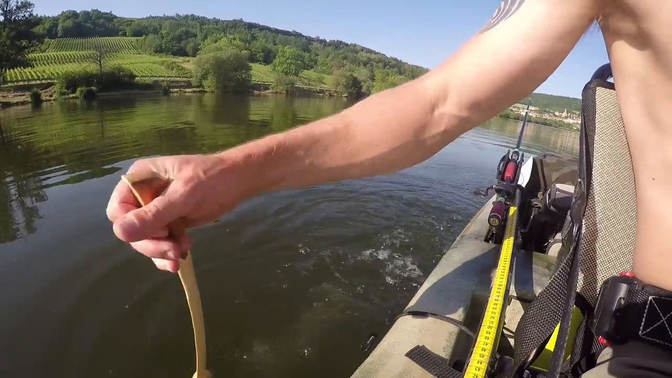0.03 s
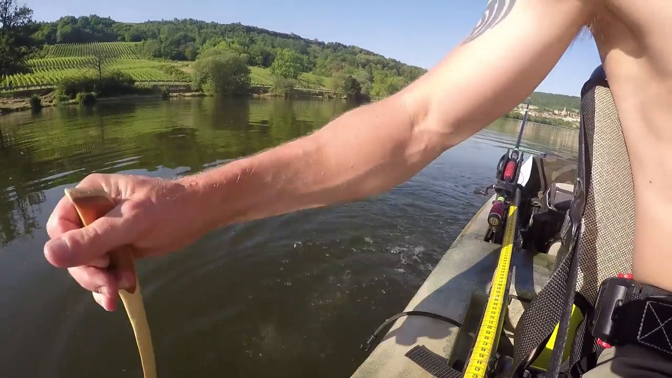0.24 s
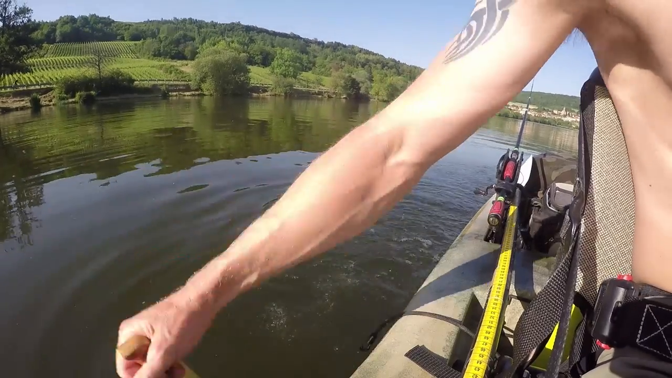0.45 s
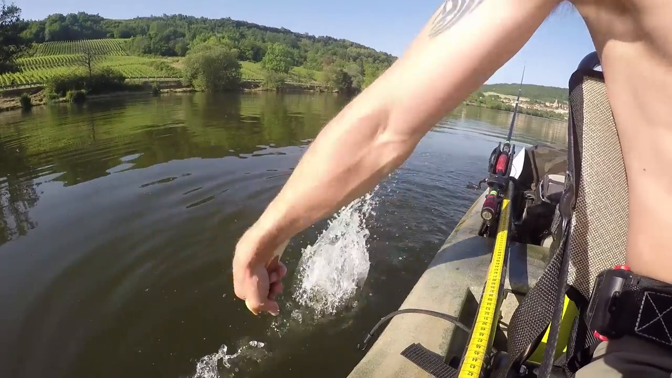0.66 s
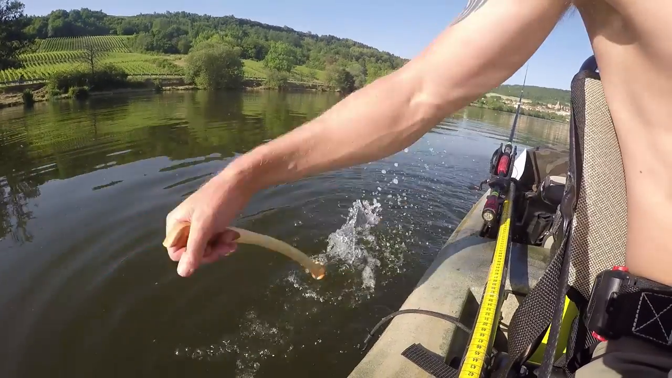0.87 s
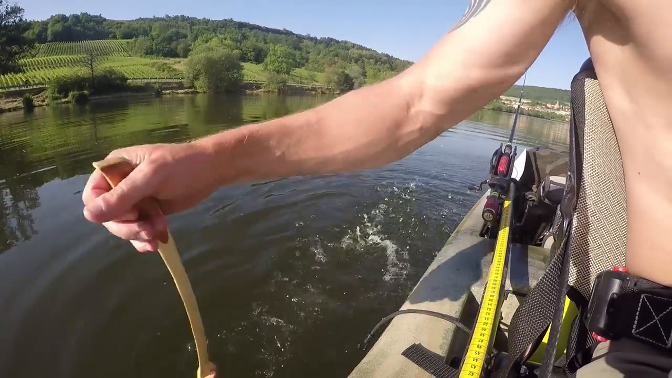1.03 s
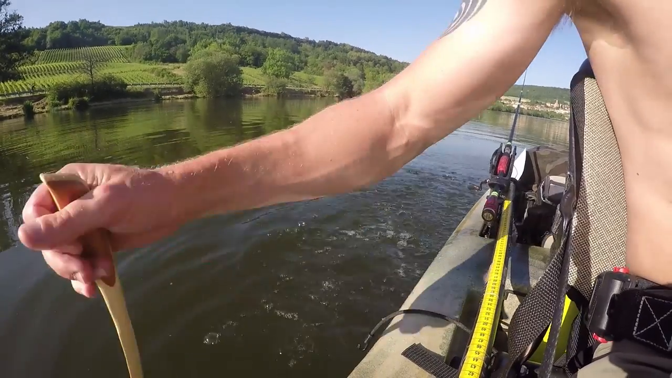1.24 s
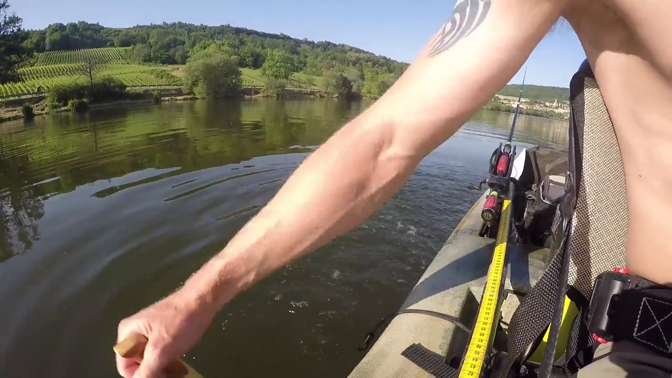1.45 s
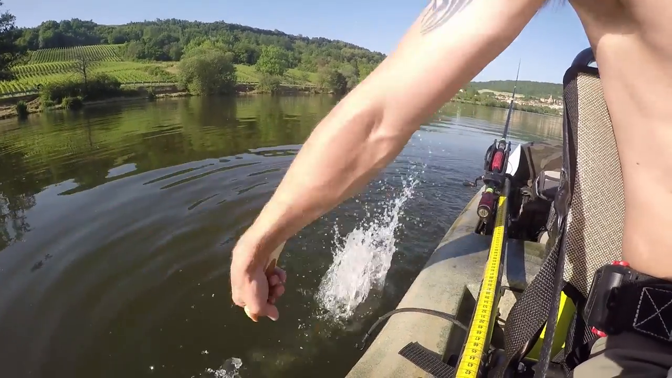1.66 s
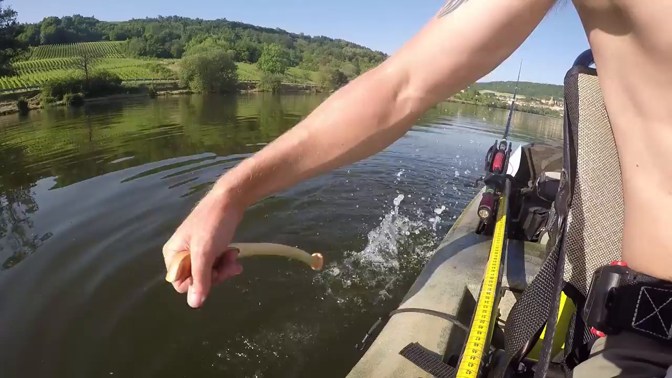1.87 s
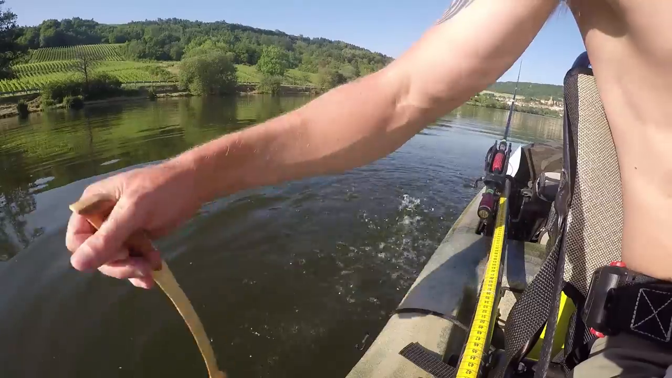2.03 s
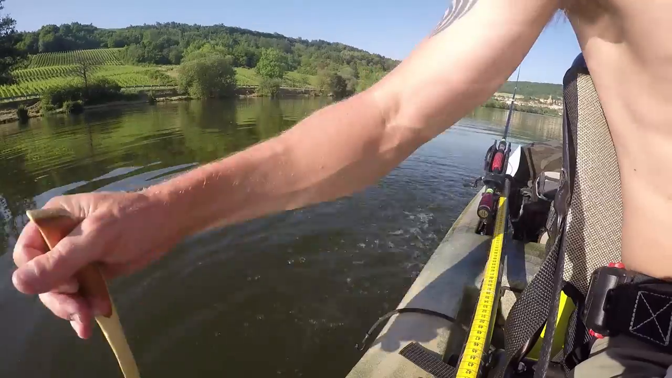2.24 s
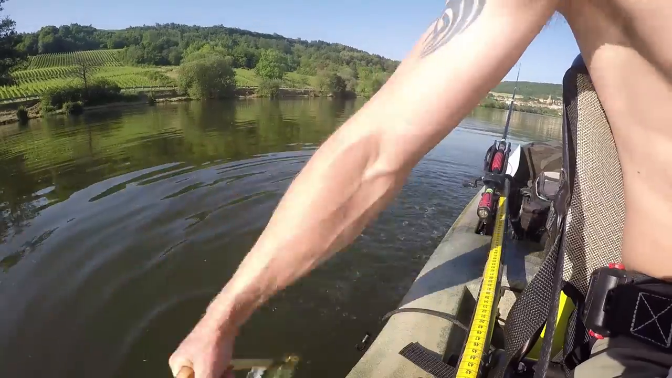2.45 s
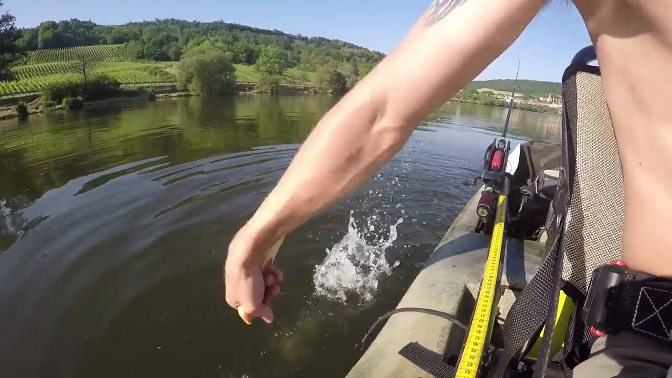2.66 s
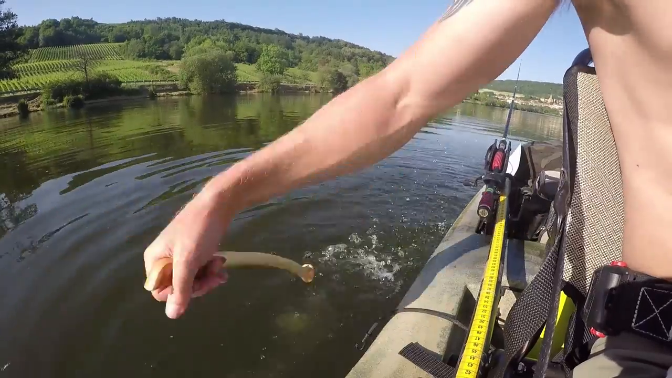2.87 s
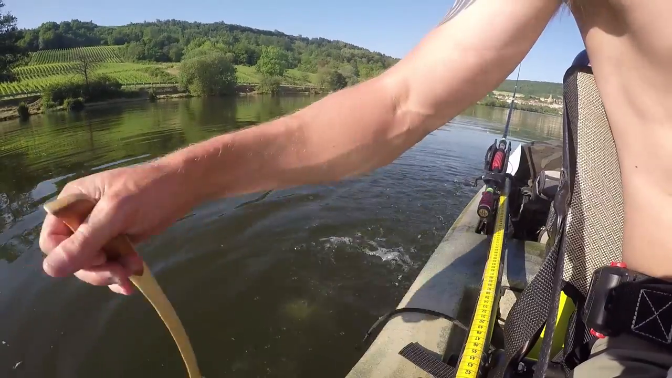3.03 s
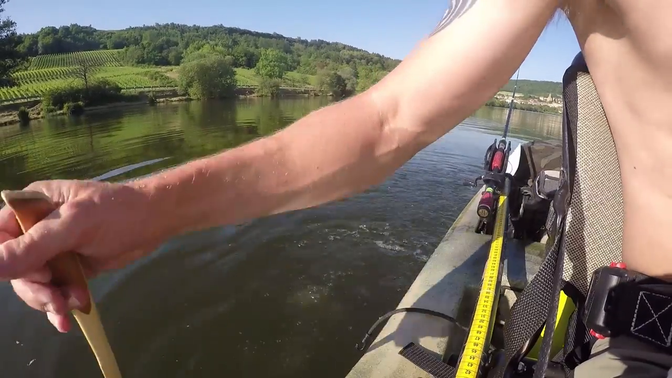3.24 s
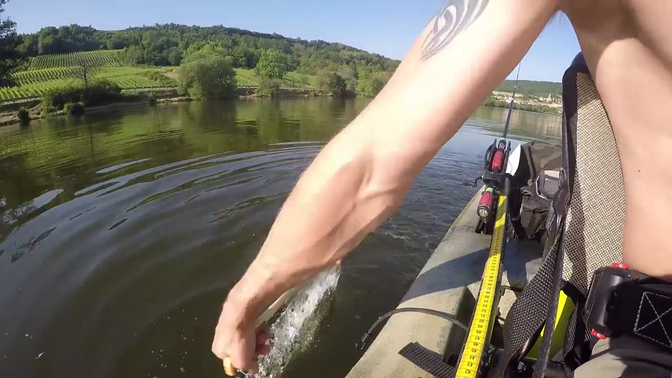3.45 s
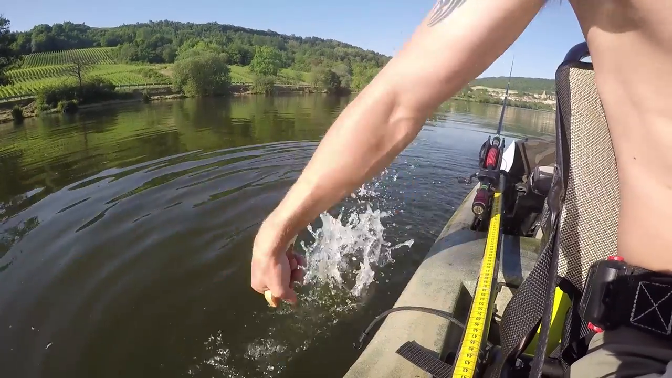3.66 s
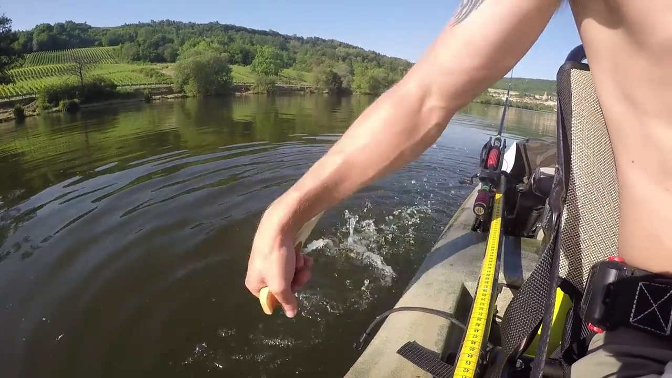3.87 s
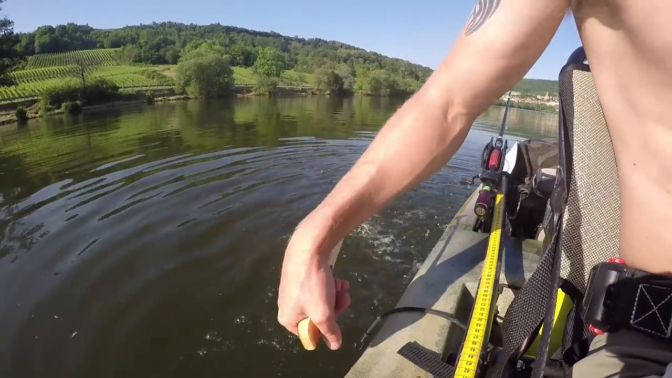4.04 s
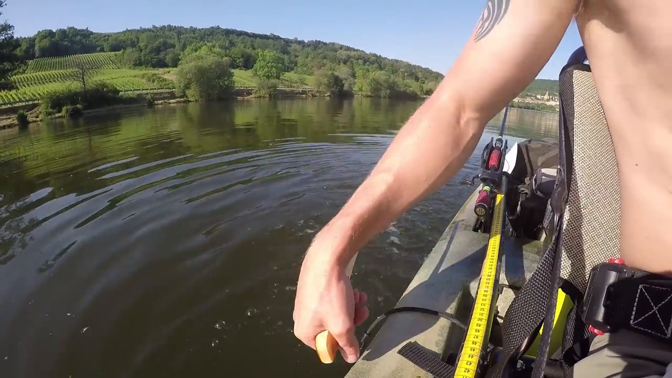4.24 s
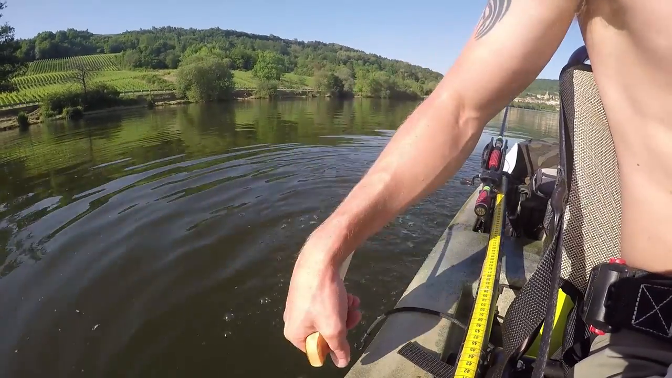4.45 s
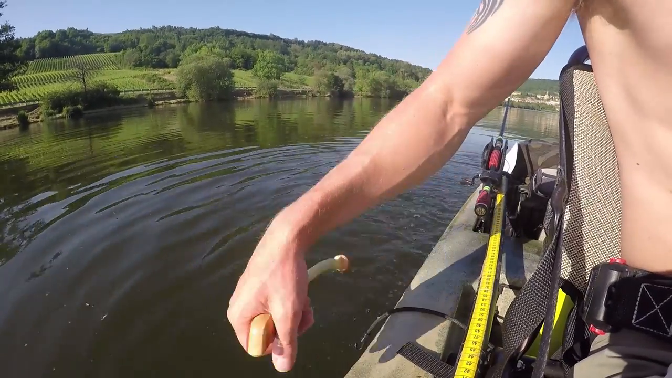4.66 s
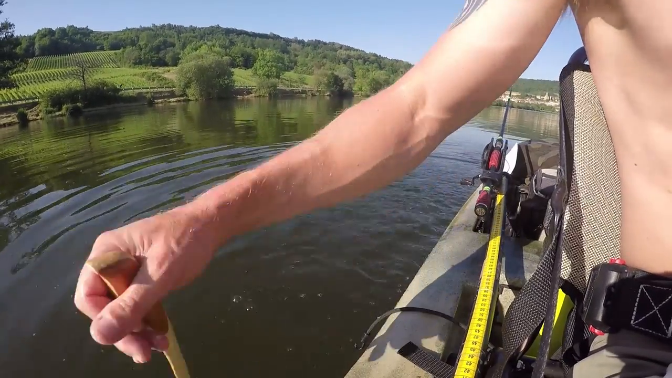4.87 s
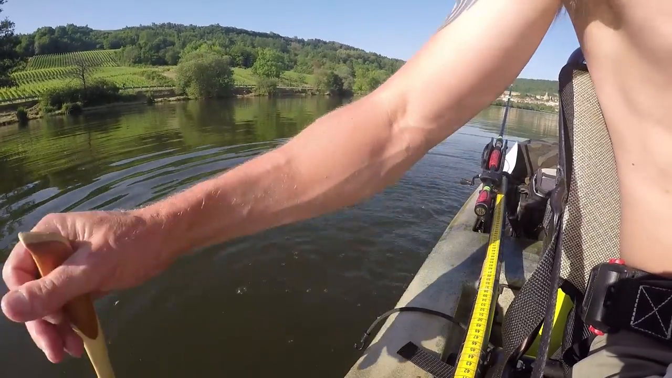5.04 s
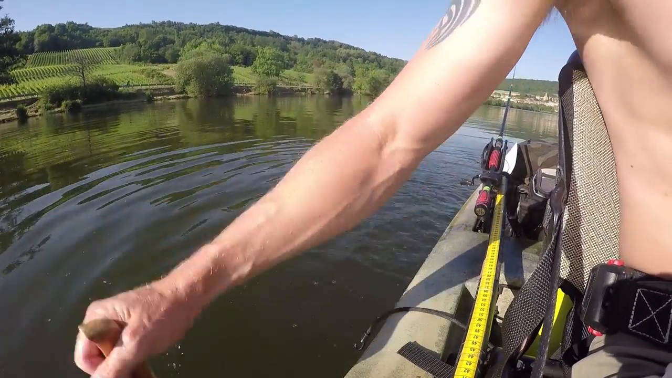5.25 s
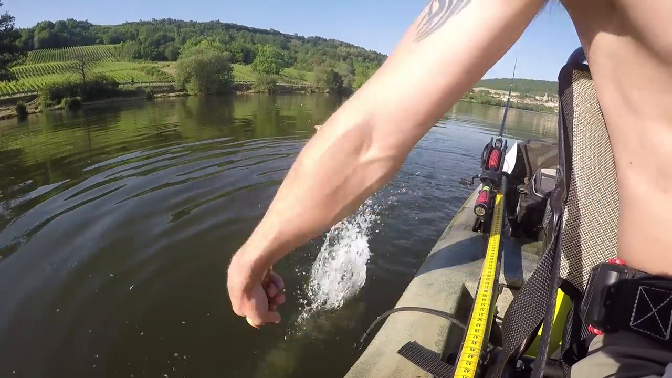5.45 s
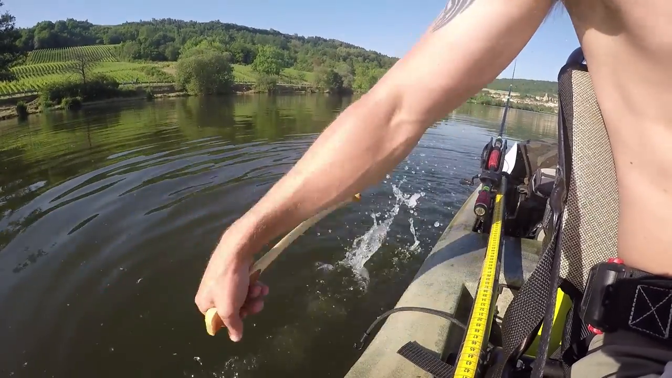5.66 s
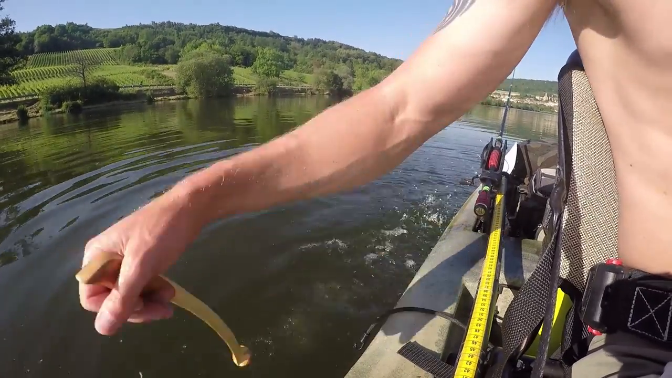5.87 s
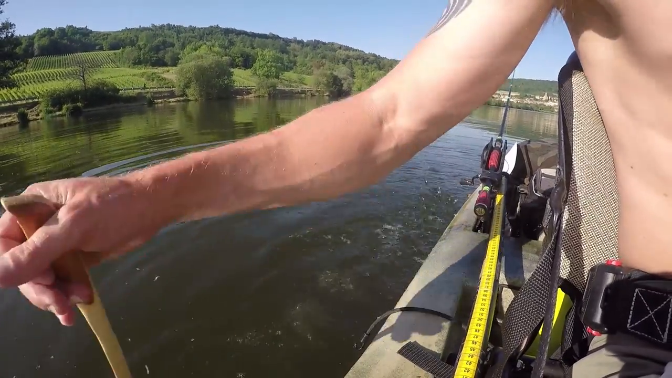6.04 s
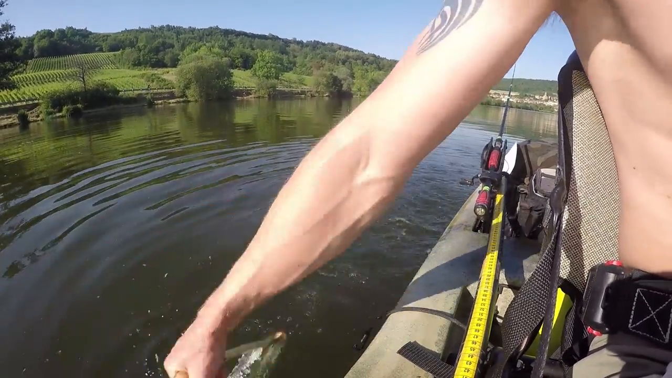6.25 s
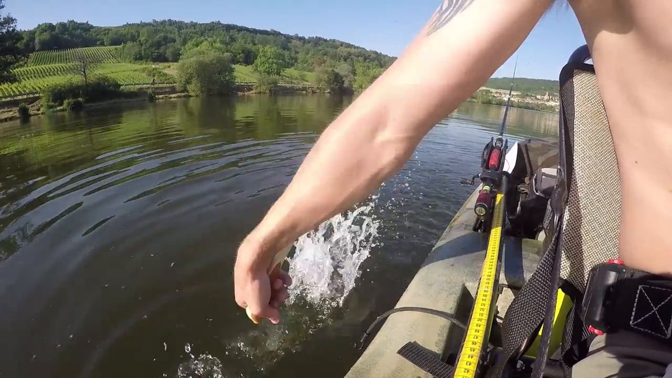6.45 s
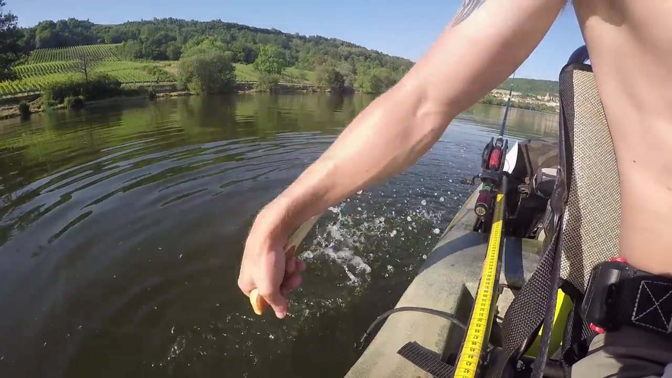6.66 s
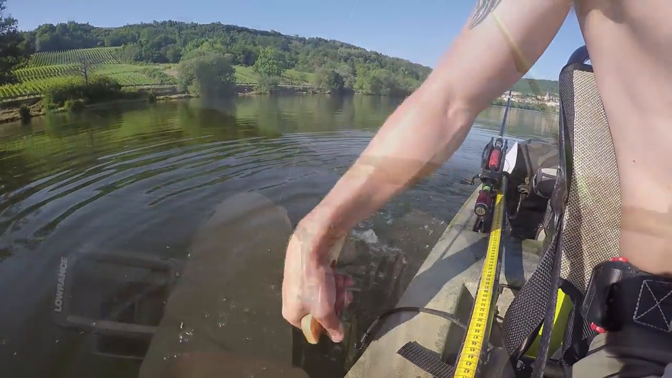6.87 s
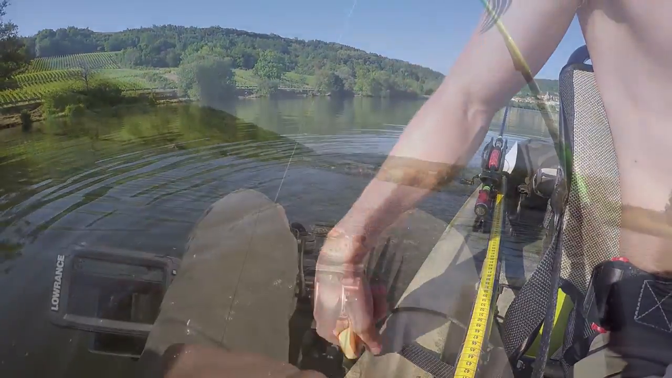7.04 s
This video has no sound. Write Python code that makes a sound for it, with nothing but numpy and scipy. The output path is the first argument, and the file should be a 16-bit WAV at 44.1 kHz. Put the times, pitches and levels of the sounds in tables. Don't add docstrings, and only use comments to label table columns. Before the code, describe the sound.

Close, booming water plops, spaced about a second apart with one longer pause, each followed by a patter of falling spray and drops.

```python
import sys
import numpy as np
from scipy import signal
from scipy.fft import rfft, irfft, next_fast_len
from scipy.io import wavfile
from scipy.ndimage import uniform_filter1d, map_coordinates

SR = 44100
rng = np.random.default_rng(int(sys.argv[2]) if len(sys.argv) > 2 else 0)


def ratio(d):
    e = np.asarray(d, float) / 20
    return 10 ** e


def master(y):
    cut = np.clip(np.atleast_2d(y).T, -1, 1)
    pcm = np.round(cut * 32767)
    wavfile.write(sys.argv[1], SR, pcm.astype(np.int16))


N = 313265
TIME = np.arange(N) / SR

# (time [s], level [dB])
WIND = [(0, -51), (.4, -54), (1.0, -49.5), (1.45, -53.5), (2.2, -52), (2.5, -49.5), (3.0, -52),
        (3.55, -49.5), (4.4, -52), (5.0, -49), (6.0, -50.5), (6.3, -42.5), (6.75, -47.5), (7.1, -43)]
# (frequency [Hz], density [dB per Hz])
BUFFET_SPECTRUM = [(7.1, -24.5), (12, -0.5), (40, -2), (52, -1.5), (75, -14), (102, -14.5), (200, -58.5),
                   (260, -70), (440, -120)]
LAP_SPECTRUM = [(71, -19.5), (120, -1), (204, -8), (226, -10.5), (329, -7), (427, -12), (800, -42),
                (1040, -70.5), (1760, -120)]
AIR_SPECTRUM = [(290, -42), (500, -2.5), (851, -5.5), (2850, -9.5), (3200, -10), (3910, -9.5),
                (5600, -11.5), (12700, -19), (15600, -17.5)]
# (frequency [Hz], level [dB])
WHINE = [(10287, -91)]
# (frequency [Hz], width [Hz], level [dB])
CASE_MODES = [(2733, 86, -6), (4650, 72, 1), (5400, 110, -12.5), (7860, 270, -26.5), (12320, 760, -9.5)]
# (last fall [s], first level [dB], last level [dB], dribble level [dB], gurgle re fizz [dB])
SHOWERS = [
    (1.1, -55, -50.5, -55.5, -4.5),
    (2.082, -55, -54, -53.5, -1.5),
    (2.93, -54, -57, -57, -1.5),
    (4.088, -49, -52.5, -63, -5),
    (5.955, -53, -62.5, -61, -6),
    (6.79, -55, -52, -49, -9.5),
]
# (time [s], fizz level [dB], gurgle level [dB])
RIPPLES = [
    (0.384, -66, -53),
    (1.37, -71, -73),
    (2.418, -92, -80),
    (3.27, -70, -67),
    (4.2, -75, -76),
    (4.49, -80, -66),
    (6.285, -78, -78),
]
# (frequency [Hz], density [dB per Hz])
FIZZ_SPECTRUM = [(590, -51), (1000, 1), (1300, -19), (2500, -1), (3460, -11.5), (4660, -6), (5050, -18),
                 (5470, -7), (8860, -25.5), (13900, -19.5), (15600, -34)]
SWISH_SPECTRUM = [(250, -21.0), (500, 9.5), (1000, -3.0), (1500, -16.5), (3000, -45.5)]
# (time [s], peak level [dB], bubble
# pitch [Hz])
DROPS = [(0.572, -39, 3200), (0.579, -32, 4630), (0.611, -20.5, 2580), (0.6351, -13, 4600),
         (0.857, -32, 5150), (0.864, -37, 1900), (1.579, -31, 4800), (1.592, -29, 1460), (1.6, -31, 1350),
         (1.625, -11, 5320), (1.696, -26, 2800), (1.99, -31, 3840), (2.05, -29, 5900), (2.071, -33, 5200),
         (2.546, -31, 3050), (2.57, -22, 5500), (3.508, -28, 5730), (3.518, -43, 2800), (5.4265, -16, 4200),
         (5.427, -15.5, 3350), (5.488, -26, 4730), (5.812, -36.5, 3970), (5.942, -30, 6300),
         (6.002, -51, 2600), (5.977, -44, 6800), (0.0725, -34, 3550), (0.781, -22, 2700),
         (0.852, -37, 1480), (0.8913, -28.5, 2700), (0.9385, -28.5, 1680), (1.062, -30, 2680),
         (1.091, -30.5, 2760), (1.2635, -42, 4350), (1.263, -48, 2750), (1.198, -54, 2600),
         (1.8467, -29, 2880), (1.9735, -33, 2250), (1.99, -25.5, 2740), (2.0482, -26, 2310),
         (2.824, -29.5, 2530), (2.89, -36, 4700), (3.801, -25.5, 2800), (3.8162, -29, 2080),
         (3.845, -26.5, 2770), (3.926, -45, 2200), (3.9896, -28.5, 2320), (4.032, -26.5, 2400),
         (5.6471, -27.5, 2670), (5.774, -25.5, 2660), (5.843, -19.5, 1970), (5.908, -36, 4700),
         (5.943, -20.5, 4500), (6.571, -33, 5100), (6.655, -29.5, 3830), (6.7125, -24, 2730),
         (6.782, -28, 2650),
         (0.784, -24, 4050), (1.198, -34.5, 4630), (1.773, -35, 4100), (1.933, -32, 1940),
         (2.1231, -38, 2330), (2.943, -34, 4870), (3.7274, -41, 4620), (4.125, -46, 2300),
         (4.1709, -47, 2760), (4.276, -43.5, 5400), (5.58, -37, 1750), (5.746, -45, 1660),
         (5.814, -28, 2840), (6.799, -31.5, 1570), (6.8427, -36, 2140), (0.8, -31, 5700),
         (0.9593, -31, 4760), (1.03, -32, 2360), (1.04, -29, 4630), (1.047, -31, 5400), (1.11, -36, 4650),
         (1.2167, -40, 4430), (1.8, -44, 4520), (1.834, -31, 2570), (1.872, -32.5, 5400),
         (1.882, -33, 2620), (1.9243, -33, 6360), (2.061, -30, 2250), (2.062, -30, 4600),
         (2.0688, -26, 2380), (2.1538, -41, 2550), (2.649, -35, 4750), (2.703, -37, 5500),
         (2.7177, -34, 2600), (2.7965, -41, 2650), (2.9, -30.5, 3800), (3.693, -36, 2250),
         (3.755, -33, 2880), (3.7765, -32, 2550), (3.801, -30, 3900), (3.8443, -31, 5400),
         (3.883, -33, 2260), (3.893, -32, 4650), (3.9023, -32, 3130), (3.937, -38, 2200),
         (3.9697, -31, 4550), (4.049, -42, 3850), (4.08, -38, 2300), (5.686, -53, 3050),
         (5.7069, -46, 2300), (5.796, -33, 2270), (5.79, -36, 2200), (5.853, -26, 2700), (5.921, -37, 2080),
         (5.943, -27.5, 3140), (6.0274, -43, 6920), (6.512, -37.5, 2710), (6.587, -33, 4710),
         (6.605, -35, 2640), (6.7644, -36, 2890), (6.905, -38, 2470)]
# (time [s], peak level [dB], bubble pitch
# [Hz], knock re peak [dB])
HEAVY_DROPS = [(0.336, -44, 580, -13), (0.72, -22, 460, -14), (0.864, -36, 540, 3), (0.892, -33, 915, -26),
               (0.904, -29.5, 440, -1.5), (0.935, -34, 390, -6.5), (0.974, -20.5, 350, 5),
               (0.977, -26.5, 190, -23), (0.99, -26, 406, -22), (1.017, -44, 1100, -20),
               (1.04, -39, 1050, -20), (1.07, -40, 960, -20), (1.254, -54, 1380, -20),
               (1.277, -48, 930, -20), (1.992, -38, 1150, -20), (2.022, -40, 1080, -20),
               (2.89, -41, 970, -24), (3.945, -36, 760, -23), (5.837, -32, 1070, -22.5),
               (1.592, -45, 388, 13), (1.859, -32.5, 1020, -4), (1.975, -35.5, 1080, -14),
               (2.102, -34, 462, -6), (2.756, -34.5, 825, -14), (3.282, -40, 337, 1),
               (3.785, -23.5, 570, 10), (3.789, -22, 390, -15), (3.918, -28.5, 530, -25),
               (3.978, -38, 940, -13), (4.076, -41.5, 946, 6), (4.486, -33, 381, 5.5),
               (5.401, -29, 477, -21.5), (5.422, -13.5, 275, -3), (5.445, -38, 400, -20),
               (5.462, -25, 430, -17), (5.513, -21.5, 454, -21), (5.526, -26, 393, -23),
               (5.54, -28, 470, -26), (2.588, -29.5, 1090, -20), (2.597, -28, 554, -20),
               (2.654, -24, 434, -21), (5.614, -40.5, 880, -20), (2.669, -26, 408, -26),
               (0.714, -34, 1370, -17), (0.738, -34.5, 1060, -33), (0.745, -32, 520, -14),
               (0.852, -45, 1367, -19.5), (5.87, -44, 1110, -20.5), (6.475, -28, 424, -26),
               (5.813, -43, 880, -9), (5.89, -38, 1080, -14.5), (6.337, -48, 401, -17),
               (6.467, -35, 410, -22), (6.655, -35, 300, -23)]
# (time [s], peak level [dB])
TICKS = [(0.6115, -39), (0.52, -58), (5.9415, -53), (6.003, -60), (1.06, -43), (1.0904, -47), (1.1972, -54),
         (1.265, -51), (1.99, -50), (2.0494, -40), (2.1235, -57), (2.9417, -52), (3.283, -52),
         (3.8445, -48), (3.926, -45), (3.9883, -48), (4.2752, -52.5), (5.8273, -47), (5.8416, -46),
         (5.9075, -48), (6.2806, -50.5), (6.782, -44), (6.7994, -45), (6.9055, -50)]
# (frequency [Hz], density [dB per Hz])
TICK_SPECTRUM = [(5000, 7), (8000, 0.5), (13000, 0.0), (15500, -12.0)]
# (time [s], length [s], first pitch [Hz], last pitch [Hz], level [dB])
BIRDS = [(0.449, 0.1, 1780, 1730, -67), (1.211, 0.073, 4280, 3460, -60), (1.398, .014, 2800, 2790, -54),
         (2.198, 0.041, 3250, 3220, -67), (2.386, 0.058, 3750, 3600, -59.5),
         (3.117, 0.059, 2870, 3220, -67), (3.267, 0.37, 1714, 1580, -64.5), (3.253, 0.06, 3350, 3000, -65),
         (4.286, 0.064, 2870, 2590, -62), (4.358, 0.12, 2350, 2020, -68), (4.482, 0.06, 3250, 3050, -65),
         (4.55, .07, 2640, 2510, -62.5), (4.635, .1, 2160, 2190, -73), (4.668, 0.035, 2330, 2360, -65),
         (4.693, 0.066, 2440, 2650, -67), (4.19, 0.077, 3000, 3200, -74), (4.21, 0.064, 2560, 2630, -70),
         (4.335, 0.055, 1920, 1850, -68.5), (4.486, 0.027, 2010, 2060, -67),
         (4.927, 0.057, 2800, 2710, -70)]
# (time [s], length [s], top after [s], top pitch [Hz], droop [Hz per ms squared], level [dB])
ARCHED_WHISTLE = (1.36, .04, .016, 3950, 1.9, -55)
# (time [s], level [dB], decay t60 [s])
CUTS = [
    (.571, -48, 0.41),
    (1.579, -43.5, 0.44),
    (2.541, -42.5, 0.49),
    (3.504, -42, 0.23),
    (5.391, -45, 0.38),
    (6.328, -44, 0.44),
]
# (time [s], hiss level [dB], decay t60 [s], low froth re hiss [dB])
TEARS = [(0.611, -29, 0.089, -1), (0.638, -31, 0.29, 0.5), (1.588, -41, 0.26, -8), (1.632, -33, 0.28, -0.5),
         (2.578, -55, 0.21, 16), (2.61, -36.5, 0.17, -2), (3.535, -38, 0.36, -7), (3.58, -35, 0.15, 1),
         (3.6, -56, 0.25, 10), (5.431, -46, 0.12, 8), (5.467, -44, 0.19, 1), (5.482, -35.5, 0.21, -3),
         (5.824, -36.5, 0.1, 0), (6.338, -45, 0.4, -8), (.585, -58, 0.23, 12), (3.511, -44, 0.36, -5),
         (4.483, -52, 0.045, -6), (2.613, -50, 0.048, 21), (6.364, -39, 0.29, 4.5),
         (6.401, -29.5, 0.075, 3), (6.452, -41.5, 0.083, -8), (0.623, -32.5, 0.05, 10),
         (.71, -54, 0.15, 14), (.65, -42, 0.04, 8), (.778, -45, 0.076, -9.5), (.85, -49.5, 0.12, 4),
         (.889, -44, 0.15, -4), (0.971, -50.5, 0.2, 13), (1.027, -45, 0.092, -9), (1.082, -46, 0.064, -8),
         (1.84, -44, 0.17, -5), (1.056, -42, 0.14, -23), (1.92, -50, 0.058, -16), (1.971, -42, 0.23, -22),
         (2.038, -40.5, 0.13, -23), (2.586, -55, 0.043, 13), (2.821, -48, 0.11, -14),
         (2.886, -46, 0.19, 0.5), (3.548, -33, 0.078, 10), (3.727, -58, 0.045, -15),
         (3.794, -45.5, 0.15, 3), (3.918, -43.5, 0.29, -13), (4.045, -50, 0.046, -1),
         (5.898, -41, 0.11, -16), (6.77, -47, 0.31, -25)]
# (frequency [Hz], density [dB per Hz])
TORN_SPECTRUM = [(820, -35), (1400, -7.5), (2120, 1.5), (3760, -9), (4690, -6), (5030, -5), (8670, -21.5),
                 (13900, -20), (15600, -30)]
FROTH_SPECTRUM = [(250, -21.5), (550, 4.5), (1100, 1.5), (1700, -9.0), (3000, -41.5)]
# (time [s], peak level [dB], cup pitch [Hz], cup re peak [dB], dull part re
# sharp crack [dB])
SLAPS = [
    (0.632, -11.5, 306, -2, -19),
    (1.623, -13, 350, 2, -12),
    (2.5658, -14.5, 298, -2, -17),
    (3.562, -11, 310, -5, -5.5),
    (3.5726, -17.5, 396, -14, -1),
    (5.4236, -13, 473, 2, -18),
    (6.39, -17, 393, -2, 2),
]
SLAP_TREBLE_DB = [
    5,
    -2,
    4.5,
    -12,
    -9,
    -4.5,
    2,
]
# (frequency [Hz], density [dB per Hz])
CRACK_SPECTRUM = [(410, -5.5), (700, -0.5), (931, -13), (2400, 0.5), (3590, -9), (4650, -7), (7430, -21.5),
                  (12800, -27), (15600, -28.5)]
DULL_SPECTRUM = [(400, -14.5), (800, -2.0), (1400, -0.5), (2200, -29)]
# (time [s], pitch [Hz], level [dB], decay t60 [s])
TUBE_BOOMS = [
    (0.634, 88, -4, 0.08),
    (1.626, 79.3, -4, 0.18),
    (2.568, 84.4, -11, 0.72),
    (3.564, 84, -5, 0.093),
    (5.4263, 88.4, -10, 0.31),
    (6.3927, 81.7, -9, 0.091),
]
# (tube level [dB], tube decay t60 [s], slosh level [dB], slosh decay t60 [s])
SETTLING = [
    (-24, 0.47, -20.5, 0.2),
    (-22.5, 0.62, -20.5, 0.19),
    (-19, 0.35, -30.5, 0.28),
    (-33.5, 0.91, -27.5, 0.37),
    (-20, 0.3, -21, 0.16),
    (-42, 0.29, -23.5, 0.24),
]
# (frequency [Hz], density [dB per Hz])
TUBE_SPECTRUM = [(30, -34), (55, 6.5), (85, 5.5), (130, -12), (250, -73)]
SLOSH_SPECTRUM = [(150, -24), (300, 1.5), (430, -5.0), (570, -16.0), (900, -27.0), (1600, -27.0), (3000, -59.5)]
# (time [s], first pitch [Hz], last pitch [Hz], glide time [s], level [dB])
CAVITIES = [
    (0.647, 96.4, 387, 0.02, 5),
    (1.6501, 138, 384, 0.013, 0),
    (2.6148, 124, 422, 0.0066, 0),
    (3.576, 111, 355, 0.018, 1),
    (5.48, 168, 457, 0.0139, -5),
    (6.3964, 90.6, 537, 0.05, 4),
]
# (opening time [s], life [s], abruptness of the fade [1], pinched off after [s])
CAVITY_SHAPES = [
    (0.0041, 0.017, 1.03, 0.056),
    (0.0014, 0.027, 1.93, 0.11),
    (0.00099, 0.017, 2.05, 0.034),
    (0.003, 0.031, 1.53, 0.084),
    (0.0027, 0.03, 2.7, 0.03),
    (0.0073, 0.033, 1, 0.063),
]


def unit(x):
    return x / np.sqrt(np.mean(x ** 2) + 1e-20)


def wobble(rate):
    return map_coordinates(rng.standard_normal(int(N * rate / SR) + 4), [TIME * rate])


def filtered(x, response):
    m = next_fast_len(N + 8192)
    return irfft(rfft(x, m) * response(np.fft.rfftfreq(m, 1 / SR)), m)[:N]


def above(x, edge_hz):
    return filtered(x, lambda hz: 1 / (1 + (edge_hz / (hz + 1)) ** 6))


def noise(spectrum, patchy_db=0):
    f, db = np.transpose(spectrum)
    z = signal.stft(rng.standard_normal(N + 256), nperseg=256)[2]
    blotch = uniform_filter1d(rng.standard_normal(z.shape), size=3, axis=0)
    blotch = uniform_filter1d(blotch, size=4, axis=1)
    white = signal.istft(z * ratio(patchy_db * unit(blotch)), nperseg=256)[1][:N]
    return unit(filtered(white, lambda hz: ratio(np.interp(np.log(hz + 1), np.log(f), db))))


def add(track, s, sound):
    part = track[round(s * SR):][:len(sound)]
    part += sound[:len(part)]


def stretch(s, t):
    return slice(round(s * SR), round(s * SR) + len(t))


def impulses(s, db):
    return np.bincount(np.round(s * SR).astype(int), ratio(db), N)


def fading(ticks, seconds):
    return signal.lfilter([1], [1, -np.exp(-1 / (seconds * SR))], ticks)


def bubbles(s, db, hz, cycles, rise):
    t = np.arange(1024) / SR
    age = t * (hz / cycles)[:, None]
    tone = np.sin(2 * np.pi * hz[:, None] * t * (1 + rise * age / 2))
    size = np.exp(-3 * age) * (1 - np.exp(-14 * age)) * np.cos(np.pi / 2 * t / t[-1])
    wave = ratio(db)[:, None] * tone * size
    at = np.round(s * SR).astype(int)[:, None] + np.arange(len(t))
    return np.bincount(at.ravel(), wave.ravel(), N + SR)[:N]


def housing(x):
    def response(f):
        peaks = sum(ratio(db) * 1j * f * w / (c * c - f * f + 1j * f * w) for c, w, db in CASE_MODES)
        return 0.74 + 0.63 * peaks
    return filtered(x, response)


def rocking():
    widest_s = 0.13
    ages = [np.maximum(TIME - s, 0) / widest_s for s, *_ in CAVITIES]
    return sum(u * np.exp(1 - u) for u in ages)


def river():
    rock = rocking()
    wake = np.exp(-((TIME - 1.4) / 0.9) ** 2)
    buffet_db = np.interp(TIME, *np.transpose(WIND)) + 2 * rock
    lap_db = -59.5 + 4 * rock + 2.5 * wake
    buffet = ratio(buffet_db + 5.5) * unit(ratio(0.87 * wobble(7.3)) * noise(BUFFET_SPECTRUM))
    lap = ratio(lap_db + 2.0) * unit(ratio(1.8 * wobble(29.0)) * noise(LAP_SPECTRUM))
    air = ratio(-65.5) * noise(AIR_SPECTRUM)
    flutter_db = 8 + 5 * np.sin(2 * np.pi * 24 * TIME)
    whine = sum(ratio(db + flutter_db) * np.sin(2 * np.pi * hz * TIME) for hz, db in WHINE)
    return buffet + lap + air + whine


def showers():
    flight_s, rise_db_per_s, stop_s, drain_db_per_s = 0.09, 137, 0.004, 103.5
    ripple_s = 0.06
    fizz = ratio(-74.5) + ratio(-55.5 - drain_db_per_s * TIME)
    gurgle = ratio(2) * fizz
    for (s, *_), (end, first_db, last_db, dribble_db, gurgle_db) in zip(CAVITIES, SHOWERS):
        start = s + flight_s
        fall_db = np.interp(TIME, [start - 1, start, end, end + stop_s, end + stop_s + 1],
                            [first_db - rise_db_per_s, first_db, last_db,
                             dribble_db, dribble_db - drain_db_per_s])
        fizz = fizz + ratio(fall_db)
        fade_db = 1.5 * np.clip((TIME - start) / (end - start), 0, 1)
        gurgle = gurgle + ratio(fall_db + gurgle_db - fade_db)
    for s, fizz_db, gurgle_db in RIPPLES:
        swell = np.exp(-((TIME - s) / ripple_s) ** 2)
        fizz = fizz + ratio(fizz_db) * swell
        gurgle = gurgle + ratio(gurgle_db) * swell
    return fizz, gurgle * ratio(3.1 * wobble(23))


def patter(per_second, seconds):
    draw = rng.random((2, N))
    return fading((draw[0] < per_second / SR) * ratio(15.6 * draw[1]), seconds)


def spray():
    fizz_size, gurgle_size = showers()
    place, pitch, size, ring = rng.random((4, 2700))
    s, size_db = place * (N - 1) / SR, 15 * size
    a, b = slice(0, 1700), slice(1700, None)
    tiny = unit(bubbles(s[a], size_db[a], 1200 * 6.0 ** pitch[a], 5 + 12 * ring[a], rise=0.072))
    fat = unit(bubbles(s[b], 0.77 * size_db[b], 420 * 4.1 ** pitch[b], 4 + 8 * ring[b], rise=0.26))
    bed = housing(noise(FIZZ_SPECTRUM, patchy_db=2.5))
    top = above(bed, 7000)
    hiss = (bed - top) * unit(2.4 + patter(240, 0.002)) + top * unit(0.27 + patter(67, 0.0014))
    fizz = unit(ratio(1.04 * wobble(22)) * (hiss + ratio(-6.5) * housing(tiny)))
    swish = noise(SWISH_SPECTRUM, patchy_db=1.0)
    gurgle = unit(fat + ratio(6.5) * swish)
    return fizz_size * fizz + ratio(-2.0) * gurgle_size * gurgle


def drops():
    s, db, hz = np.transpose(DROPS)
    small = bubbles(s, db - 8.5, hz, 7.6 + hz * 0.0055, rise=0.03)
    small = small + bubbles(s, db - 5.0, 1.06 * hz, np.full(len(s), 5.5), rise=-0.048)
    struck = impulses(s, db - 28.0)
    splat = (fading(struck, 0.006) - fading(struck, 0.0014)) * housing(noise(FIZZ_SPECTRUM))
    tick_s, tick_db = np.transpose(TICKS)
    ticks = impulses(s, db - 43) + impulses(tick_s, tick_db + 1.0)
    click = fading(ticks, 0.0038) * noise(TICK_SPECTRUM)
    s, db, hz, knock_db = np.transpose(HEAVY_DROPS)
    knock = bubbles(s, db + knock_db - 7.0, 900 + 0.069 * hz, np.full(len(s), 7.), rise=0.042)
    heavy = bubbles(s, db + 0.5, hz, hz * 0.019, rise=0.08)
    return small + splat + click + knock + heavy


def birds():
    out = np.zeros(N)

    def whistle(s, t, length, hz, db):
        edges = np.clip(np.minimum(t, length - t) / 0.0051, 0, 1)
        add(out, s, ratio(db) * edges * np.sin(2 * np.pi * np.cumsum(hz) / SR))

    for s, length, first_hz, last_hz, db in BIRDS:
        t = np.arange(0, length, 1 / SR)
        hz = last_hz + (first_hz - last_hz) * (1 - t / length) ** 3.25
        whistle(s, t, length, hz, db - 2 * t / length)
    s, length, top_s, top_hz, droop, db = ARCHED_WHISTLE
    t = np.arange(0, length, 1 / SR)
    whistle(s, t, length, top_hz - droop * (1000 * (t - top_s)) ** 2, db - 150 * t)
    return out * ratio(-2.0 + 0.84 * wobble(68))


def tearing():
    high, low, edge = np.zeros((3, N))
    t = np.arange(SR // 3) / SR
    for s, db, t60, froth_db in TEARS:
        size = ratio(db - 60 * t / t60) * (1 - np.exp(-t / 0.0045))
        add(high, s, size)
        add(low, s, ratio(froth_db) * size)
    for s, db, t60 in CUTS:
        add(edge, s, ratio(db - 60 * t / t60) * (1 - np.exp(-t / 0.0068)))
    hiss = unit(housing(noise(TORN_SPECTRUM, patchy_db=3.0)) * ratio(1.3 * wobble(250)))
    froth = noise(FROTH_SPECTRUM, patchy_db=8.5)
    bright = unit(above(hiss[::-1], 2660))
    return high * hiss + low * froth + edge * bright


def slaps():
    out, t = np.zeros(N), np.arange(SR // 10) / SR
    sharp = housing(noise(CRACK_SPECTRUM, patchy_db=-6.0))
    dull = noise(DULL_SPECTRUM)
    treble = above(sharp, 2770)
    u = t / 0.0074
    burst = u ** 2.44 * np.exp(-3.3 * u)
    for (s, db, hz, cup_db, dull_db), treble_db in zip(SLAPS, SLAP_TREBLE_DB):
        here = stretch(s, t)
        ragged = (sharp + (ratio(treble_db) - 1) * treble)[here]
        crack = unit(burst * ragged) + ratio(dull_db) * unit(burst * dull[here])
        cup = np.sin(2 * np.pi * hz * t) * np.exp(-u ** 3) * (1 - np.exp(-6 * u))
        add(out, s - .0025, ratio(db - 21.0) * crack + ratio(db + cup_db) * cup)
    return out


def hull():
    out, t = np.zeros(N), np.arange(SR // 2) / SR
    shake = noise(TUBE_SPECTRUM)
    slosh = noise(SLOSH_SPECTRUM, patchy_db=5.5)
    for (s, hz, db, t60), (opens, *_) in zip(TUBE_BOOMS, CAVITIES):
        choke_db = 450 * np.maximum(t + s - opens, 0)
        add(out, s, -ratio(db - 60 * t / t60 - choke_db) * np.sin(2 * np.pi * hz * t))
    for (s, *_), (tube_db, tube_t60, slosh_db, slosh_t60) in zip(CAVITIES, SETTLING):
        here = stretch(s, t)
        mutter = ratio(tube_db - 60 * t / tube_t60) * shake[here]
        mutter = mutter + ratio(slosh_db - 60 * t / slosh_t60) * slosh[here]
        add(out, s, (1 - np.exp(-(t / 0.024) ** 2)) * mutter)
    return out


def plops():
    out, t = np.zeros(N), np.arange(SR // 4) / SR
    pocket = ratio(-18 - 60 * t / 0.18)
    for (s, first_hz, last_hz, glide, db), (opening, life, abrupt, pinch) in zip(CAVITIES, CAVITY_SHAPES):
        turns = last_hz * t - (last_hz - first_hz) * glide * (1 - np.exp(-t / glide))
        opened = 1 - np.exp(-(t / opening) ** 1.48)
        shutting = np.exp(-(t / life) ** abrupt - (t / pinch) ** 12)
        add(out, s, -ratio(db) * opened * (shutting + pocket) * np.sin(2 * np.pi * turns))
    return out


def scene():
    background = river() + spray() + drops() + birds()
    strokes = tearing() + slaps() + hull() + plops()
    return (background + strokes)[None]


def band_limit(x):
    return signal.sosfilt(signal.butter(12, 15710, fs=SR, output="sos"), x)


def record(dry):
    heard = signal.lfilter(*signal.butter(1, 16, "high", fs=SR), dry)
    soft = heard / (1 + abs(heard / 0.93) ** 9) ** (1 / 9)
    mix = filtered(soft[0], lambda hz: np.clip((15800 - hz) / 400, 0, 1) ** 2)[None]
    return band_limit(mix)


dry = scene()
out = record(dry)
master(out)
```